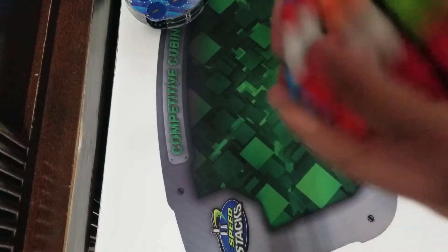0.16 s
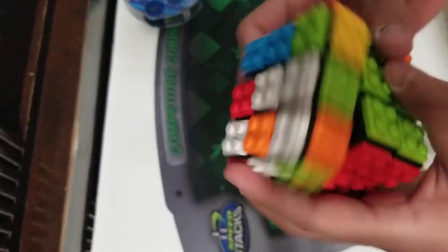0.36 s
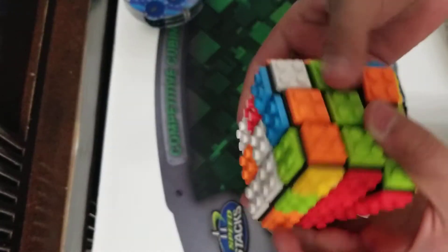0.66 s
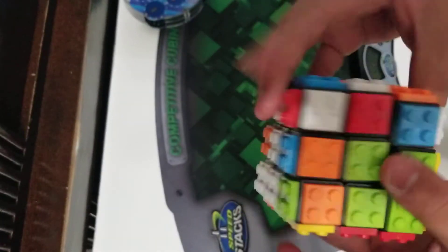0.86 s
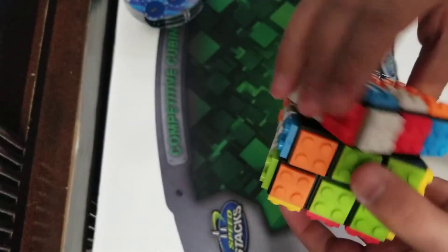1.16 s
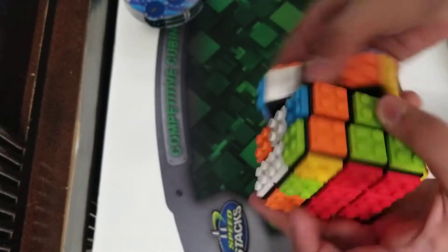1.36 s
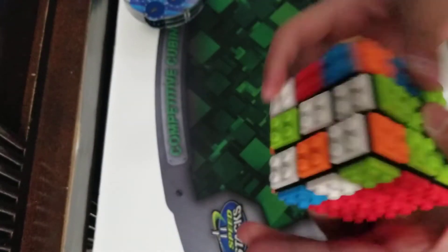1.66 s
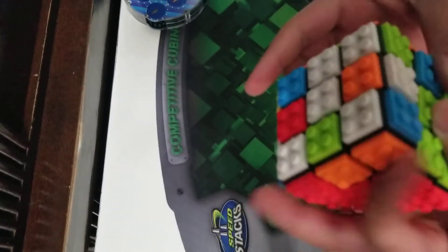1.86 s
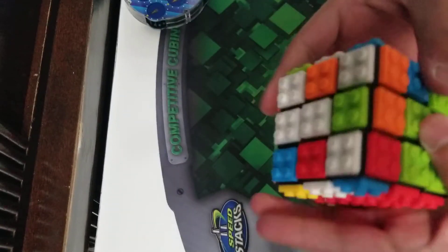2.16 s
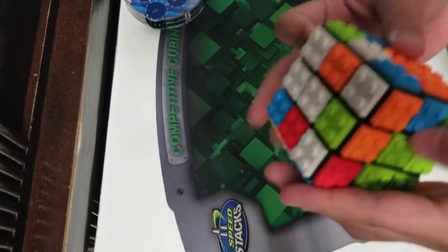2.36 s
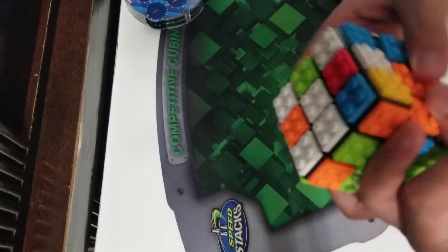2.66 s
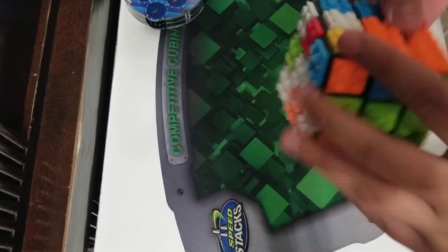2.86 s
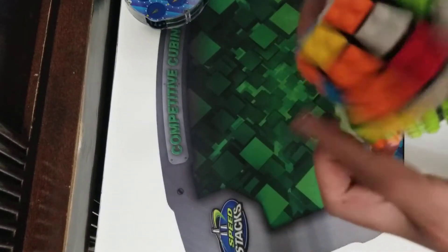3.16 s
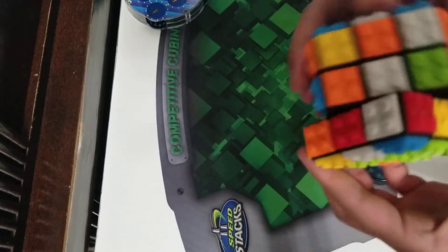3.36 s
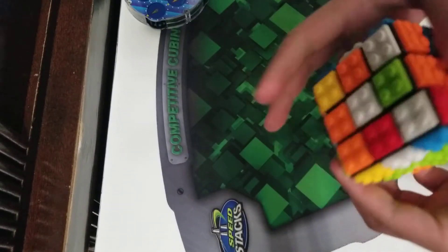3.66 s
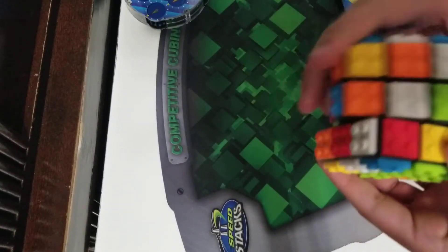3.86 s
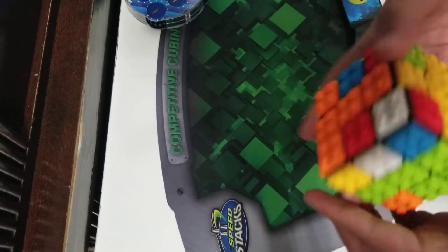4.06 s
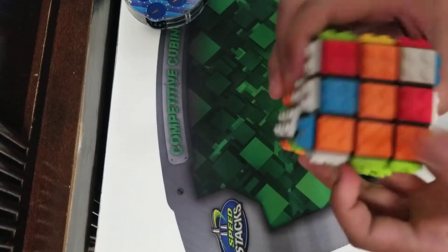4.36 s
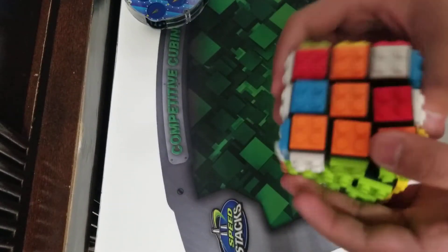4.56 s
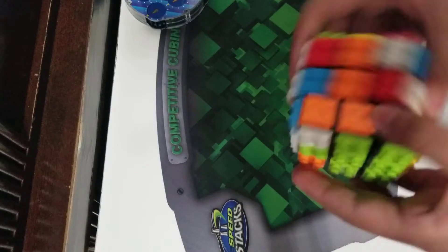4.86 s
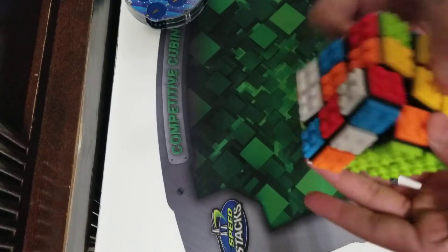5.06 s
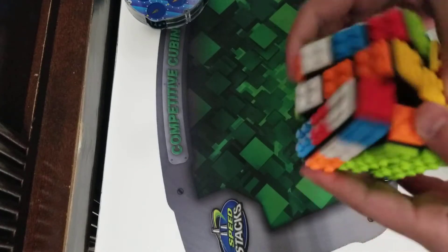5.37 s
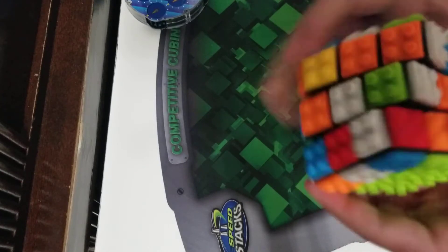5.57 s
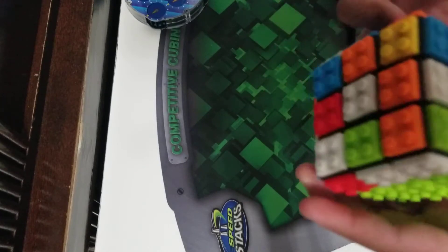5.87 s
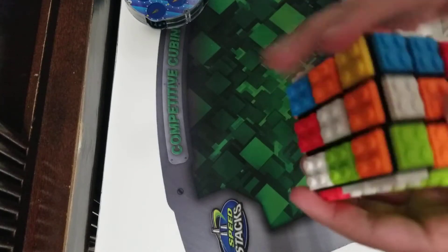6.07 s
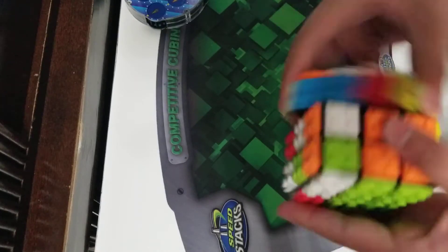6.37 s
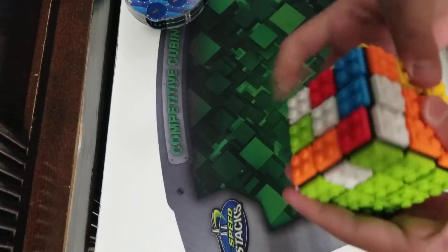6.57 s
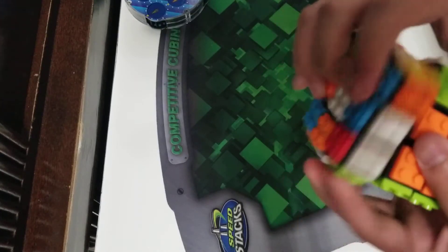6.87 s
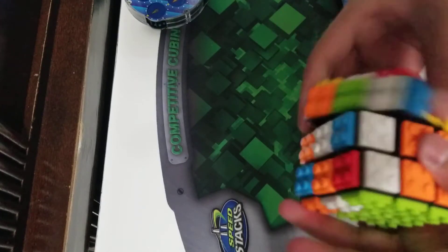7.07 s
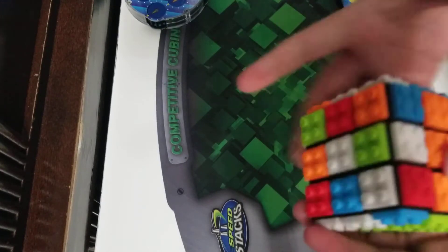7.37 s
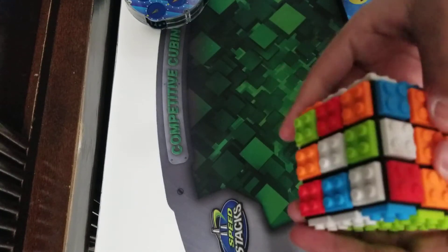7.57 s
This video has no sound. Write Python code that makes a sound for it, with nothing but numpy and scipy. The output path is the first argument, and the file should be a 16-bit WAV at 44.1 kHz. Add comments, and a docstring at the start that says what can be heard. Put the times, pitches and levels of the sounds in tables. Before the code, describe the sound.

Hands turn a plastic puzzle cube quickly, close to the microphone in a small quiet room. The layers slide with a gritty rub and snap into place in bursts of short, slightly hollow clacks, with faint finger taps in the pauses. The turning eases briefly, then comes the busiest, loudest run of clicks. One last soft tap leaves only a low ventilation hum and faint hiss.

```python
"""A plastic puzzle cube is turned quickly by hand, close to a two-port phone in a small quiet room.
Over low ventilation hum and faint hiss, a fingertip lands and the first layers slide with a gritty rub.
From 0.4 s pieces catch and snap home in bursts of short clacks that ring the hollow core; table and
walls answer briefly, and fingers regrip in the gaps. After 5 s the turning eases, then the busiest,
loudest run comes from 6.3 to 7.3 s. One last soft tap leaves the hum and hiss."""
import sys
import numpy as np
from scipy import signal
from scipy.fft import rfft, irfft, next_fast_len
from scipy.io import wavfile
from scipy.ndimage import uniform_filter1d, map_coordinates

SR = 44100
rng = np.random.default_rng(int(sys.argv[2]) if len(sys.argv) > 2 else 0)


def wrap_up_sound(samples):
    """Save the sound to the file named by the first command line argument, as 16-bit audio."""
    columns = np.atleast_2d(samples).T
    # keep every value between -1 and 1, then stretch to whole-number steps
    tamed = np.clip(columns, -1, 1)
    steps = np.round(tamed * 32767).astype(np.int16)
    wavfile.write(sys.argv[1], SR, steps)


N = 340445

# pieces catching or snapping home: t/s, level/dB, hollow thump re level/dB, brightness/dB, fall/ms
CLACKS = [(0.3826, -40.5, -18, -13, 1.8), (0.4053, -39, -12, 11.5, 0.63), (0.4191, -37, -35, -15, 4.8),
          (0.4341, -42, -12, -13, 0.74), (.5205, -46, -32, -11, .9), (0.5351, -35, -25, 4.5, 0.66),
          (0.5625, -38, -28, 8.5, 1.8), (.669, -50, -21, -20, 1), (0.6853, -44.5, -14, -21, 8.9),
          (0.7453, -52, -24, -25, 1.4), (0.77, -47.5, -12, -11.5, 2.1), (.8, -30.5, -24, -5, 3.2),
          (0.8443, -27, -8.5, -7, 1.1), (.858, -27.5, -17, -4.5, 1.5), (0.9093, -30, -24, -5.5, 1.3),
          (.9182, -37.5, -30, -4, 1), (0.9866, -51.5, -25, 3, 2), (1.0106, -43, -24, -31, 1.5),
          (1.0182, -40, -33, -3.5, 2.4), (1.0603, -37, -31, -14, 0.47), (1.129, -58.5, -11, -9, 4.4),
          (1.2649, -41, -7.5, -23, 0.96), (1.2717, -34, -15, -2, 1.8), (1.2902, -39, -10, -1, 3.2),
          (1.3194, -26.5, -19, -12, 2.9), (1.359, -45.5, -18, -23, 1.3), (1.4153, -41, -20, -30, 1.3),
          (1.471, -36, -12, -11.5, 1.6), (1.4843, -31, -32, 3, 6.9), (1.511, -25.5, -20, 3.5, 6.5),
          (1.6097, -34, -13, -5, 0.95), (1.6171, -29, -17, 0, 5.2), (1.66, -44, -19, -8, 1.1),
          (1.688, -51, -23, -21, 1.1), (1.7397, -36, -9, -16, 2.5), (1.7729, -24, -10.5, -3, 1.6),
          (1.7899, -31.5, -14.5, 2, 0.63), (1.7966, -25, -20, -1, 8.1), (2.003, -33, -14.5, -6, 6.8),
          (2.0111, -33.5, -42, 0.5, 1.7), (2.022, -36.5, -28, -3, 1.6), (2.1178, -45.5, -41, -4, 3.5),
          (2.1556, -52, -22.5, 1.5, 3.2), (2.508, -45, -24, -19, .7), (2.5256, -51, -21, -5, 1.1),
          (2.5477, -25.5, -19.5, -6, 1.6), (2.5743, -23.5, -15.5, 2.5, 1.9), (2.6142, -19, -17, -5.5, 2.4),
          (2.6328, -27.5, -9, 1.5, 10), (2.7112, -49, -25, 2, 2.3), (2.7435, -35.5, -15, -3, 1.4),
          (2.7518, -35.5, -15.5, -5, 1.4), (2.7651, -36, -9.5, -2, 3.2), (2.996, -33.5, -14.5, -7.5, 5),
          (3.0341, -27, -14.5, -0.5, 3.6), (3.0626, -28.5, -26, -8, 2), (3.1552, -38, -17, -1, 5.8),
          (3.2772, -52.5, -22, -20, 2), (3.3238, -42.5, -19, -9.5, 1.5), (3.3274, -44.5, -40, -17, 2.3),
          (3.358, -42.5, -15, -9, 2.5), (3.379, -40.5, -31, -13, 1.3), (3.4148, -49, -13, -7, 1.3),
          (3.444, -33.5, -16, -1.5, 0.62), (3.4805, -22, -11.5, -10.5, 2.1), (3.751, -46, -14, -32, 1.9),
          (3.8069, -45.5, -16, -18, 1.3), (3.8237, -38.5, -24, -7, 2.2), (3.8473, -48.5, -12, -20, 1.9),
          (3.8955, -50.5, -7, -12, 1.8), (3.9153, -31.5, -12, -1.5, 1.2), (3.9489, -26, -13, -9.5, 2.5),
          (3.9795, -31.5, -13, -13.5, 5.6), (4.0128, -44.5, -12, -8, 1.9), (4.1497, -40, -31, -4.5, 9),
          (4.172, -35.5, -22, -5.5, 0.65), (4.1847, -37.5, -14, -0.5, 12), (4.2289, -43.5, -6.5, -7, 0.39),
          (4.2812, -49.5, -8, 1.5, 1.6), (4.295, -58, -4.5, -4, 2.9), (4.467, -44.5, -9, -8.5, 3.4),
          (4.4842, -47.5, -10, -9, 6.5), (4.4992, -51.5, -19, -8, 1.4), (4.5418, -49, -22, -13, 1.9),
          (4.5822, -61.5, -22, -1, 1.4), (4.649, -48.5, -27, -4.5, 3.4), (4.7574, -43, -18, 0, 2),
          (4.802, -42, -8, -16, 1.7), (4.8095, -39.5, -17, -18, 1.1), (4.8178, -43, -29, -9, 14),
          (4.8507, -24, -10, -2, 5.2), (4.871, -27.5, -17, -0.5, 11), (4.9058, -31.5, -16, -0.5, 5.3),
          (4.9534, -22, -21.5, -0.5, 2.9), (4.9726, -37.5, -17, 4, 2.8), (5.029, -48.5, -33, -3, 1.5),
          (5.074, -38, -38, -7.5, 3.5), (5.1376, -51, -36, -1, 0.67), (5.1448, -46, -28, 1.5, 2.4),
          (5.3834, -42, -19, -6, 0.25), (5.421, -63, -16, 2, 1.3), (5.4552, -51, -21, -10, .9),
          (5.469, -40, -26, -10.5, 2.9), (5.5699, -45, -16, -8, 1.6), (5.6192, -58, -23.5, -13, 1.5),
          (5.748, -50, -11, -28, 3.4), (5.7764, -26, -16, -3.5, 3.2), (5.8992, -34, -18.5, 3.5, 1.2),
          (6.2513, -41, -16.5, -13, .9), (6.261, -41.5, -27, -11, 2.7), (6.2736, -40, -10, -9, 2.4),
          (6.311, -45.5, -17, -19, 2.5), (6.3434, -20.5, -21.5, -2.5, 2.3), (6.358, -22.5, -27, -4, 6.1),
          (6.3864, -26.5, -19, -6, 4.6), (6.4327, -32, -29, 1, 3.3), (6.4592, -24.5, -11.5, -1.5, 1.9),
          (6.4793, -17, -15.5, -0.5, 5.8), (6.6041, -38.5, -13, -1.5, 1.6), (6.6228, -36, -16, -14, 1.1),
          (6.6463, -29, -16, 0, 1.5), (6.661, -20, -14.5, -1, 3.5), (6.688, -27, -18.5, 4, 2.4),
          (6.743, -42.5, -13, 0, 3.8), (6.7637, -39.5, -18, -5, 1.5), (6.797, -37, -24, 0, 3),
          (6.8088, -31.5, -21, 3.5, 1.7), (6.8245, -40, -30, 4, 4.3), (6.8367, -30.5, -42, 0, 7.1),
          (6.8695, -39, -39, -2, 1.6), (6.8915, -38, -33, -10, 1.3), (6.9491, -38.5, -24, -10, 0.7),
          (6.9639, -31, -28, -1.5, 2.6), (6.9962, -30, -17.5, 1, 3), (7.0066, -37, -21, -15, .9),
          (7.056, -38, -34, -12, 2.7), (7.0633, -40, -19, 3, 1.8), (7.0856, -28.5, -18.5, -5.5, 2.65),
          (7.1397, -35, -7, -6.5, 4.2), (7.1474, -39.5, -22, -1, 2.9), (7.178, -22, -18, -1.5, 1.7),
          (7.237, -39, -12, -5, .8), (7.2423, -31, -19, -3, 3.1), (7.2559, -46, -32, -1, 1.3),
          (7.296, -43, -18, -13, 0.99)]
# fingers finding a new grip: t/s, level/dB
FINGER_TAPS = [(0.144, -70), (1.958, -65.5), (2.219, -71), (2.26, -64.5), (2.3, -68.5), (2.419, -70.5),
               (3.272, -62), (3.614, -63.5), (4.086, -64), (4.109, -68), (4.387, -67), (4.623, -72),
               (4.64, -61), (5.653, -63), (6.113, -64), (6.128, -65), (7.345, -61.5)]
# tone colour of the plastic: f/Hz, level/dB
PLASTIC_EQ = [(260, -38), (450, -17), (847, -21), (928, -15), (1530, -5.5), (1770, -5.5), (1940, -8.5),
              (3290, -10), (7100, -11.5), (7650, -17), (10500, -6), (15300, -18), (16500, -39.5)]
# brief rings of the hollow pieces: f/Hz, width/Hz, level/dB
PIECE_MODES = [(917, 50, -7.5), (1114, 81, -7.5), (1300, 26, -3.5), (1490, 56, 2), (1630, 46, -10),
               (1932, 280, -2.5), (2270, 44, -9), (2730, 93, -14), (3140, 46, -12.5), (4150, 730, -7)]
# air and frame of the core: f/Hz, width/Hz, level/dB
CORE_MODES = [(392, 29.2, 2.5), (320, 49, -6), (187, 58, -17), (634, 450, -18.5)]
# tilt of what rings on after a clack: f/Hz, level/dB
LINGER_EQ = [(300, 1.5), (800, 3), (1600, 1.5), (3000, 1), (7000, -2), (12000, -2.5)]
# stereo image of a contact: f/Hz, left-right likeness
CONTACT_LIKENESS = [(300, 0.81), (700, 0.92), (1400, 0.35), (3000, 0.043), (7000, 0.074)]
# a layer sliding round: t/s, length/s, level/dB, brightness/dB
TURNS = [(-.02, .02, -65.5, 10.5), (0.336, .02, -65, 7), (0.358, .08, -57, 7.5), (0.505, .06, -53, -6.5),
         (0.671, .11, -57, 2.5), (.79, .12, -64, 5), (.97, .11, -58, -0.5), (1.1, .06, -73.5, -4.5),
         (1.265, .17, -53, 3.5), (1.471, .07, -48, -4), (1.605, .04, -45.5, 0), (1.657, .03, -68, 0),
         (1.76, .07, -51, 5), (1.991, .05, -57, 8), (2.116, .03, -62, 1.5), (2.2, .1, -77, 2),
         (2.52, .06, -53.5, 8), (2.59, .07, -48, 1), (2.707, .09, -58.5, 0.5), (2.95, .02, -70.5, -2),
         (2.981, .03, -53.5, 3), (3.02, .05, -52.5, 2.5), (3.142, .02, -48.5, 0), (3.282, .03, -65, 0),
         (3.332, .04, -54.5, 4), (3.38, .05, -64, 3), (3.456, .08, -53, 1), (3.715, .03, -75, -5.5),
         (3.746, .02, -61, 3), (3.814, .03, -60.5, 0), (3.909, .11, -56, -1.5), (4.137, .08, -51, -7),
         (4.28, .03, -72, 5.5), (4.468, .05, -62.5, -2), (4.53, .07, -77, -7.5), (4.639, .12, -58.5, 0),
         (4.791, .18, -51.5, 2.5), (5.032, .07, -64.5, 2.5), (5.135, .02, -59, -2.5), (5.363, .1, -56, 2.5),
         (5.57, .04, -70, -4.5), (5.63, .06, -75.5, -4), (5.738, .02, -62, -7.5), (5.762, .05, -57.5, 8),
         (5.909, .02, -65, 13), (6.205, .03, -70, -2), (6.241, .09, -54, 1.5), (6.351, .07, -47, 1.5),
         (6.44, .07, -44.5, 7), (6.622, .09, -49.5, 0), (6.797, .07, -44, 1), (6.949, .05, -50, -4),
         (7.069, .06, -51.5, 3.5), (7.141, .07, -47, 4), (7.221, .05, -57, -1)]
# tone colour of the sliding faces: f/Hz, level/dB
RUB_EQ = [(300, -49), (500, -27), (900, -20), (1400, -4.5), (1800, -2.5), (2300, -6.5), (3300, -12.5),
          (6300, -14.5), (7700, -25), (11000, -15), (15300, -28.5), (16500, -46)]
# decay of the room: f/Hz, t60/s
ROOM_DECAY = [(200, 0.24), (530, 0.16), (1400, 0.098), (3700, .16), (9700, 0.14)]
# stereo image of the room: f/Hz, left-right likeness
ROOM_LIKENESS = [(300, 0.67), (1000, 0.47), (2500, 0.073)]
# tone colour of the hum and hiss: f/Hz, level/dB
AIR_EQ = [(15, -55), (25, -15.5), (55, -5), (70, -8), (97, -21.5), (111, -5), (130, -15), (145, -11),
          (157, -17.5), (195, -24), (796, -35), (7920, -41.5), (16000, -38)]
# stereo image of the hum and hiss: f/Hz, left-right likeness
AIR_LIKENESS = [(30, 0.97), (150, 0.77), (500, 0.63), (3000, 0.077)]

SIZE, LEAD = 3072, 800  # samples in a clack, and before its peak
RISE_MS, RISE_SHARE = .8, 0.17  # attack of a clack, and what each ms of fall adds
TAP_HOLLOW_DB, TAP_BRIGHT_DB, TAP_FALL_MS = -4, -12, 0.89
TICK_DB, TICK_SCATTER_DB, TICK_SHARE = 3.5, 3, .75  # ticks top the rub, in this first share of a turn
TICK_HOLLOW_DB, TICK_BRIGHT_DB, TICK_FALL_MS = -23, -14.5, 1.6
ATTACK_DB_PER_S, RELEASE_DB_PER_S = 999, 301.5  # of the rub
AIR_DB, TOP_HZ = -69.5, 16900
LAG_S = .00007  # the left port is farther from the hands


def clacks():
    """Each clack is a few ms of tiny contacts that swell and die; returns direct sound and room send."""
    start_s, level_db, hollow_db, bright_db, rise_ms, fall_ms = contacts()
    t, hz = (np.arange(SIZE) - LEAD) / SR, np.fft.rfftfreq(SIZE, 1 / SR)
    rise, fall = np.clip(rise_ms, .1, 6) / 1000, np.clip(fall_ms, .2, 9) / 1000
    envelope = np.where(t < 0, np.exp(t / rise) + 0.16 * np.exp(t / 0.0032), np.exp(-t / fall))
    noise = rng.standard_normal((3, len(start_s), SIZE))
    grains = amp(2.5 * np.clip(noise[2], -3, 2)) * noise[:2]
    grains[0, :, LEAD] = 3  # the main piece lands hardest
    rattle = ports(*rfft(envelope * grains), along(CONTACT_LIKENESS, hz))
    # a light contact is thin: it loses lows and upper mids
    scoop = along([(750, 1.5), (1300, 0.1), (2200, 0.13), (3500, 0.89), (6000, 0.85), (8500, 0.14)], hz)
    thin_db = 0.14 * np.clip(level_db + 33.5, -30, 0) * scoop
    colour = causal(along(PLASTIC_EQ, hz) + bright_db * treble(hz) + thin_db)
    spectrum = rattle * colour * piece_rings(hz, len(start_s))
    # the loudest 3 ms below 6 kHz set the level
    body_power = uniform_filter1d(np.mean(irfft(spectrum * (hz < 6000)) ** 2, axis=0), size=130)
    snap = irfft(spectrum) * amp(level_db) / np.sqrt(body_power.max(axis=1, keepdims=True))
    # heard from all sides at once, the chance colour of a clack evens out
    spread = np.roll(irfft(colour * causal(along(LINGER_EQ, hz))), LEAD, axis=1)
    spread *= np.sqrt(np.sum(snap ** 2, axis=(0, 2)) / 2 / np.sum(spread ** 2, axis=1))[:, None]
    thump = amp(level_db + hollow_db) * core_thump(t, hz)
    at = (np.round(start_s * SR).astype(int) - LEAD + np.arange(SIZE)).ravel()
    place = lambda hits: np.bincount(at, hits.ravel(), N + SIZE)[:N]
    direct = np.array([place(snap[0] + thump * amp(3)), place(snap[1] + thump * amp(-2))])
    return direct, place(spread + 0.59 * thump)


def contacts():
    """Cue list of clacks, short dull finger taps and ticks, as columns; longer hits build up longer."""
    taps = [(t, db, TAP_HOLLOW_DB, TAP_BRIGHT_DB, TAP_FALL_MS) for t, db in FINGER_TAPS]
    hits = list(CLACKS) + taps + ticks(per_turn=2)
    t, level_db, hollow_db, bright_db, fall_ms = np.transpose(hits)[..., None]
    return t, level_db, hollow_db, bright_db, RISE_MS + RISE_SHARE * fall_ms, fall_ms


def piece_rings(hz, count):
    """The hollow pieces ring briefly, at new strengths for every hit."""
    ring_hz, width_hz, ring_db = np.transpose(PIECE_MODES)[..., None]
    rings = 1j * hz * width_hz / (ring_hz ** 2 - hz ** 2 + 1j * hz * width_hz)
    strengths = amp(ring_db.T + 6.2 * rng.standard_normal((count, len(PIECE_MODES))))
    return 0.91 + 0.73 * strengths @ rings


def core(hz):
    """The boxy resonances of the hollow core, alternating in polarity."""
    return sum((-1) ** k * amp(db) * 1j * hz * width / (centre ** 2 - hz ** 2 + 1j * hz * width)
               for k, (centre, width, db) in enumerate(CORE_MODES))


def core_thump(t, hz):
    """A soft push rings the core: the hollow knock under a clack, peaking at 1."""
    push = np.abs(t) * np.exp(-np.abs(t) / 0.00032) * (t > 0)
    knock = irfft(rfft(push) * core(hz))
    return knock / np.abs(knock).max()


def rub():
    """Sliding faces stick and slip: dense grit with sparse bigger spikes, through plastic and core."""
    body_gain, top_gain = turn_envelopes()
    slips = amp(2.1 * wobble(760) + 4.2 * wobble(120))
    grit = unit(slips * rng.standard_normal((2, N)))
    grit = irfft(ports(*rfft(grit), along(CONTACT_LIKENESS, np.fft.rfftfreq(N, 1 / SR))), N)
    hz = np.fft.rfftfreq(SIZE, 1 / SR)
    crossover = treble(hz) ** 3
    body_filter = irfft(causal(along(RUB_EQ, hz) - 30 * crossover))[None]
    top_filter = irfft(causal(along(RUB_EQ, hz) - 30 * (1 - crossover)))[None]
    faces = signal.fftconvolve(grit * body_gain, body_filter, axes=1)[:, :N]
    faces += signal.fftconvolve(grit * top_gain, top_filter, axes=1)[:, :N]
    return faces / np.linalg.norm(body_filter) + amp(8.5) * filtered(grit * body_gain, core)


def turn_envelopes():
    """Faders for the body and top of the rub: each turn bites fast, holds and dies away more slowly."""
    t, body, top = np.arange(N) / SR, np.zeros(N), np.zeros(N)
    for start, length, rub_db, bright_db in TURNS:
        attack_db = ATTACK_DB_PER_S * np.clip(start - t, 0, 1)
        release_db = RELEASE_DB_PER_S * np.clip(t - start - length, 0, 1)
        gain = amp(rub_db - attack_db - release_db)
        body += gain
        top += gain * amp(bright_db)
    return body, top


def ticks(per_turn):
    """Loose pieces tick lightly at chance moments in each turn; returns rows like those of CLACKS."""
    when, chance = np.transpose(rng.random((len(TURNS), per_turn, 2)), (2, 0, 1))
    start, length, rub_db, _ = np.transpose(TURNS)[..., None]
    times = np.clip(start + TICK_SHARE * when * length, LEAD / SR, None)
    level_db = rub_db + TICK_DB - TICK_SCATTER_DB * np.log(chance + .02)
    return [(t, db, TICK_HOLLOW_DB, TICK_BRIGHT_DB, TICK_FALL_MS)
            for t, db in zip(times.ravel(), level_db.ravel())]


def room(send):
    """Table and walls give a short diffuse answer, a new one each tenth of a second as the hands move."""
    wet, step = np.zeros((2, N + SR)), SR // 10
    for start in range(0, N, step):
        hz, t, noise = signal.stft(rng.standard_normal((2, SR // 3)), SR, nperseg=128)
        noise = ports(*noise, along(ROOM_LIKENESS, hz)[:, None])
        decay = amp(-60 * t / along(ROOM_DECAY, hz)[:, None])
        tail = signal.istft(noise * decay, SR, nperseg=128)[1]
        tail *= 1 - np.exp(-np.arange(tail.shape[1]) / (0.00066 * SR))  # soften the onset
        answer = signal.fftconvolve(send[None, start:start + step], tail / np.linalg.norm(tail[0]), axes=1)
        wet[:, start:start + answer.shape[1]] += answer
    return wet[:, :N]


def ventilation():
    """A gently wavering bed: low ventilation hum, nearly mono, under a wide faint hiss."""
    hz = np.fft.rfftfreq(N, 1 / SR)
    noise = ports(*rfft(rng.standard_normal((2, N))), along(AIR_LIKENESS, hz))
    bed = unit(irfft(noise * amp(along(AIR_EQ, hz)), N))
    lean_left = amp([[.9], [-.9]])
    return amp(AIR_DB + 0.43 * wobble(7.5)) * bed * lean_left


def amp(db):
    """Decibels to gain."""
    return 10 ** (np.asarray(db) / 20)


def unit(x):
    """x at an RMS of 1."""
    return x / np.sqrt(np.mean(x ** 2) + 1e-20)


def along(points, hz):
    """A curve through (f/Hz, value) points on a log frequency axis."""
    f, value = np.transpose(points)
    return np.interp(np.log(hz + 1), np.log(f + 1), value)


def treble(hz):
    """Brightness shelf: 0 in the body of a contact, nearly 1 in its sharp top."""
    return along([(2200, 0), (4500, 0.4), (8000, 0.99)], hz)


def wobble(rate):
    """A smooth random curve, rate knots a second."""
    return map_coordinates(rng.standard_normal(int(N * rate / SR) + 4), [np.arange(N) * rate / SR])


def filtered(x, response):
    """x through a filter given as a complex response of frequency."""
    size = next_fast_len(N + SR // 2)
    return irfft(rfft(x, size) * response(np.fft.rfftfreq(size, 1 / SR)), size)[..., :N]


def causal(db):
    """A minimum-phase EQ with these gains: no pre-ring."""
    cepstrum = irfft(np.log(amp(db) + 1e-6))
    half = cepstrum.shape[-1] // 2
    cepstrum[..., 1:half] *= 2
    cepstrum[..., half + 1:] = 0
    return np.exp(rfft(cepstrum))


def ports(a, b, likeness):
    """Left and right spectra from two unrelated ones, with the given likeness."""
    angle = np.arccos(np.clip(likeness, -1, 1)) / 2
    mid, side = np.cos(angle) * a, np.sin(angle) * b
    return np.array([mid + side, mid - side])


def scene():
    """The cube up close, a touch later on the left, with the room and the ventilation behind it."""
    snaps, clack_send = clacks()
    slide = rub()
    near = filtered(snaps + slide, lambda hz: np.exp(-1j * np.pi * hz * LAG_S * np.array([[1], [-1]])))
    return near + amp(-6) * room(clack_send + slide[0]) + ventilation()


def record(dry):
    """The loudest clacks are softly rounded off; the sound thins above 16 kHz and ends at TOP_HZ."""
    rounded = dry / (1 + np.abs(dry / .7) ** 3) ** (1 / 3)
    return filtered(rounded, lambda hz: amp(along([(15700, 2.5), (16100, -13.5)], hz)) * (hz < TOP_HZ))


dry = scene()
out = record(dry)
wrap_up_sound(out)
```